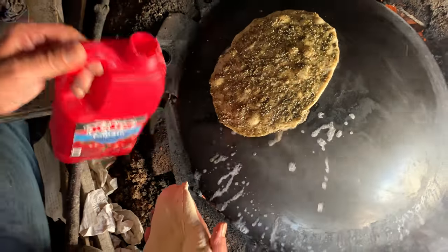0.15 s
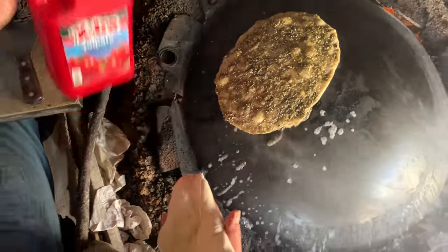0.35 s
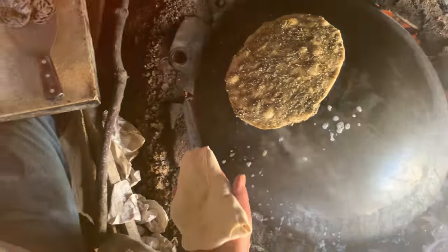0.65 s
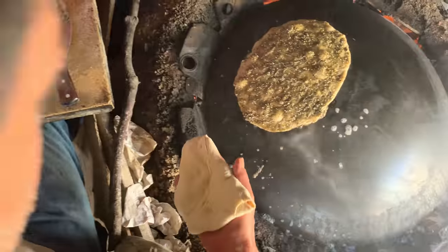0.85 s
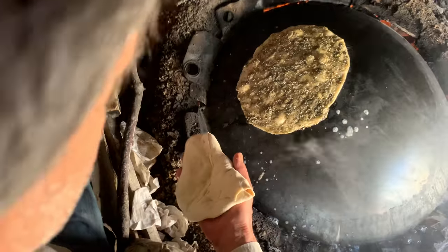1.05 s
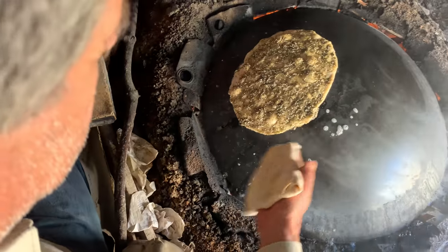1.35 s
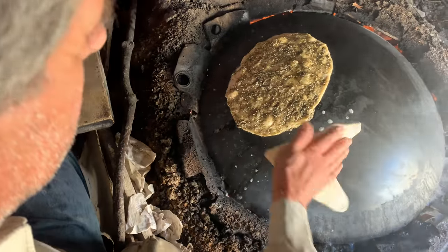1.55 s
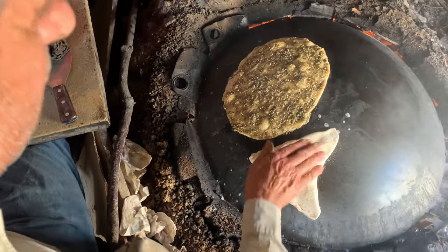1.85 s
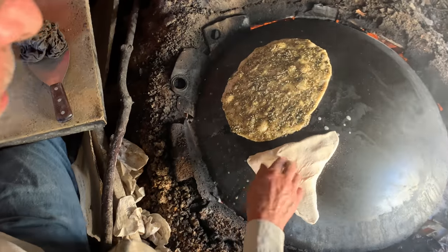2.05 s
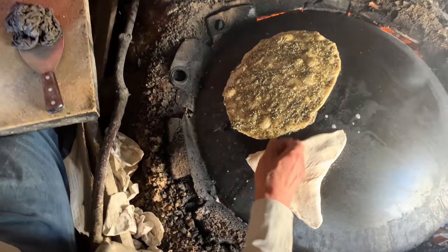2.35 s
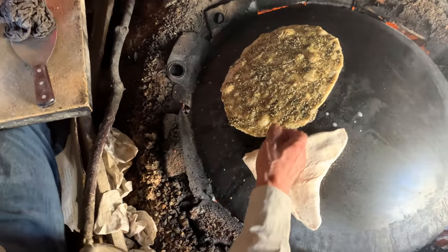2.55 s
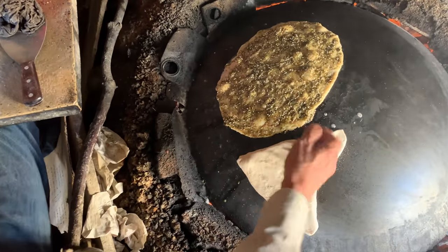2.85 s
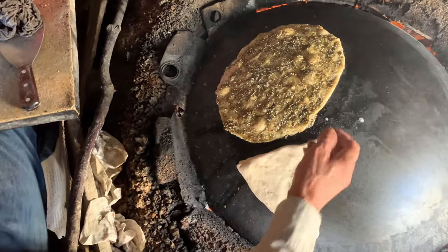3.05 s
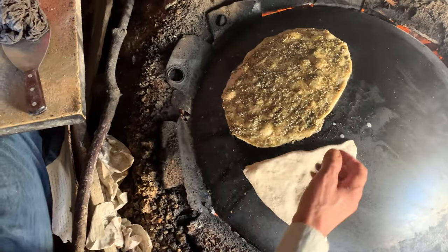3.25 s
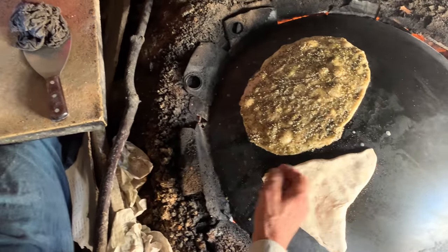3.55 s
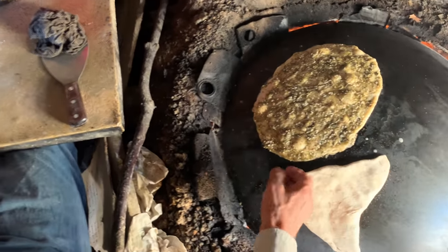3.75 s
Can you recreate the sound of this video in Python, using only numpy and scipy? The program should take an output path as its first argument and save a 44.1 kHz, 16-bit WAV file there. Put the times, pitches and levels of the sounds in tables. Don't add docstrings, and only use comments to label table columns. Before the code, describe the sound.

Water sizzles on a very hot iron griddle, bright, dense and close, fluttering strongly until about 0.9 s, with faint microphone nudges near 0.15 and 0.2 s. It then thins steadily. A jug lands and rocks dully at 1.05 s; dough slaps the damped iron at 1.68 s amid sharp pops. Soft fingertip taps follow from 2 s, with a hard low microphone knock at 3.75 s. Flames rumble quietly beneath.

```python
import sys
import numpy as np
from scipy import signal
from scipy.fft import rfft, irfft, next_fast_len
from scipy.io import wavfile
from scipy.ndimage import uniform_filter1d, map_coordinates

SR = 44100
rng = np.random.default_rng(int(sys.argv[2]) if len(sys.argv) > 2 else 0)


def to_wav(s):
    ch = np.atleast_2d(s).T
    pcm = np.round(np.clip(ch, -1, 1) * 32767)
    wavfile.write(sys.argv[1], SR, pcm.astype(np.int16))


def ratio(d):
    e = np.asarray(d, float) / 20
    return 10 ** e


N = 171990


def unit(x):
    return x / np.sqrt(np.mean(x ** 2) + 1e-20)


def along(points, hz):
    f, db = np.transpose(points)
    return np.interp(np.log(hz + 1), np.log(f + 1), db)


def curve(points):
    s, db = np.transpose(points)
    return np.interp(np.arange(N) / SR, s, db)


def wobble(rate_hz):
    knots = rng.standard_normal(int(N * rate_hz / SR) + 4)
    return map_coordinates(knots, [np.arange(N) * rate_hz / SR])


def coloured(x, points):
    m = 2 * next_fast_len(N // 2 + SR // 4)
    gain = ratio(along(points, np.fft.rfftfreq(m, 1 / SR)))
    cepstrum = irfft(np.log(gain + 1e-6), m)
    cepstrum[1:m // 2] *= 2
    cepstrum[m // 2 + 1:] = 0
    return irfft(rfft(x, m) * np.exp(rfft(cepstrum)), m)[..., :N]


def patchy(x, depth_db):
    z = signal.stft(x, nperseg=256)[2]
    across_hz = uniform_filter1d(rng.standard_normal(z.shape), 8, 0)
    field = unit(uniform_filter1d(across_hz, 20, 1))
    return signal.istft(z * ratio(depth_db * field), nperseg=256)[1][:N]


def struck(hits, modes, spread_db, rise_s):
    out, t = np.zeros(N + SR), np.arange(SR // 4) / SR
    for s, db in hits:
        ring = np.zeros(len(t))
        for hz, gain_db, t60_s in modes:
            fall_db = gain_db + spread_db * rng.standard_normal() - 60 * t / t60_s
            ring += ratio(fall_db) * np.sin(2 * np.pi * hz * t)
        start = round(s * SR)
        out[start:start + len(t)] += ratio(db) * ring * (1 - np.exp(-t / rise_s))
    return out[:N]


def bubbles(spectrum, patch_db):
    bursts_per_s, hiss_share = 8000, 0.49
    size_spread_db, largest_db = 3.5, 16
    chance, sign, size = rng.random((3, N))
    size_db = np.minimum(-size_spread_db * np.log(1 - size), largest_db)
    bursts = (chance < bursts_per_s / SR) * np.sign(sign - 0.5) * ratio(size_db)
    hail = np.sqrt(1 - hiss_share) * unit(bursts)
    hiss = np.sqrt(hiss_share) * rng.standard_normal(N)
    return unit(coloured(patchy(hail + hiss, patch_db), spectrum))


# (time [s], level [dB])
SMALL_LEVEL = [(0.0, -40), (0.03, -41), (0.25, -37.5), (0.38, -40.5), (0.42, -35.5), (0.53, -45),
               (0.69, -46), (0.82, -40.5), (0.9, -40), (0.92, -46.5), (1.43, -47), (1.47, -50), (2.48, -55),
               (2.53, -58.5), (2.79, -58), (2.82, -60), (3.23, -59.5), (3.9, -65)]
# (frequency [Hz], density [dB per Hz])
SMALL_SPECTRUM = [(300, -21.5), (1050, -18.5), (3000, -12), (6500, 0), (16000, -2.25)]
# (time [s], level [dB])
LARGER_LEVEL = [(0, -46.5), (.15, -46.5), (.32, -46.5), (.5, -47), (.68, -49), (.86, -49), (.95, -52),
                (1.4, -55), (1.55, -56.5), (2.3, -59.5), (2.9, -65), (3.9, -67)]
# (frequency [Hz], density [dB per Hz])
LARGER_SPECTRUM = [(300, -15.5), (660, -14), (1100, -7), (3000, -2), (5000, -2.27), (8000, -6),
                   (16000, -28.5)]


def sizzle():
    flurry_db = 0.38 * wobble(14) + 0.5 * wobble(60)
    small_db = curve(SMALL_LEVEL) - 1.4 + 0.29 * wobble(25.18)
    small = ratio(small_db) * bubbles(SMALL_SPECTRUM, patch_db=0.98)
    larger = ratio(curve(LARGER_LEVEL)) * bubbles(LARGER_SPECTRUM, patch_db=1.13)
    return ratio(flurry_db) * (small + larger)


# (time [s], peak level [dB])
POPS = [(0.3253, -27), (0.5528, -26), (0.5573, -23.6), (1.6455, -29), (1.71, -29), (1.7585, -26.5),
        (1.8755, -39), (1.889, -32.6), (1.9526, -31), (2.0123, -36), (2.0777, -32), (2.132, -37),
        (2.2351, -35.4), (2.5832, -46), (2.8001, -38), (3.2102, -34), (3.3259, -34.5), (3.3296, -38.0),
        (3.3407, -47), (3.6444, -38), (3.7048, -37)]
# (frequency [Hz], level [dB])
POP_SPECTRUM = [(500, -34), (3500, -15), (6500, 3), (16000, -3)]


def pops():
    steps = np.zeros(N)
    for s, db in POPS:
        steps[round(s * SR)] = -ratio(db + 3.5)
    return coloured(steps, POP_SPECTRUM)


# (frequency [Hz], level [dB])
PORT = [(6700, 0.5), (7600, 3.5), (9200, 7), (9900, 3), (10700, -1.5), (13700, 4.5), (15600, -2.5),
        (17000, -12)]


def through_port(x):
    return coloured(x, PORT)


# (time [s], low edge [Hz], high edge [Hz], level re sizzle [dB])
SLIPS = [(0.024, 5600, 7000, 0), (.025, 13600, 15700, 2), (.535, 10200, 11800, -1), (1.371, 4300, 9000, 0),
         (2.625, 12400, 15200, 2), (2.88, 13000, 14500, -3), (2.927, 11700, 13200, -3)]


def slips(water):
    slip_s = 0.024
    t, hz = np.arange(N) / SR, np.fft.rfftfreq(N, 1 / SR)
    other = np.fft.rfft(np.roll(water, -SR // 40))
    side = np.zeros(N)
    for s, low_hz, high_hz, db in SLIPS:
        window = np.cos(np.pi * np.clip((t - s) / slip_s, -0.5, 0.5))
        band = np.fft.irfft(other * (hz > low_hz) * (hz < high_hz), N)
        side += ratio(db) * window * band
    return side


# (time [s], peak level [dB])
SLAPS = [
    (1.667, -46),
    (1.6727, -45),
    (1.6757, -31.5),
    (1.6805, -47),
    (1.6828, -43),
    (1.6845, -46),
]
# (frequency [Hz], level [dB], decay T60 [s])
IRON = [(130, -16, .07), (450, -15, .02), (727, -17, .035), (1050, 0, .017), (1350, -9, .012),
        (1900, -7, .014), (3500, -14, .012)]


def slaps():
    return struck(SLAPS, IRON, spread_db=3, rise_s=0.00026)


# (time [s], peak level [dB], pitch [Hz], thump weight [1])
PATS = [(2.009, -60.5, 956, 0.6), (2.098, -60, 1050, 0.6), (2.359, -68, 1130, 0.7),
        (2.502, -55.5, 463, 0.71), (2.569, -61.5, 468, 0.6), (2.657, -62, 339, 0.96),
        (2.768, -61, 990, 0.63), (2.906, -62, 1060, 0.81), (2.986, -59.5, 490, 0.6), (3.01, -66, 463, 0.75),
        (3.146, -58.5, 546, 0.6), (3.178, -60, 458, 0.49), (3.227, -55, 526, 0.37), (3.411, -58, 328, 0.6),
        (3.485, -57, 1050, 0.42), (3.651, -57, 482, 0.8), (3.776, -61.5, 1200, 0.6), (3.838, -61, 650, 0.6),
        (3.871, -52, 363, 0.4)]


def pats():
    out, t = np.zeros(N + SR), np.arange(SR // 8) / SR
    soft = signal.butter(2, [300, 1200], "band", fs=SR, output="sos")
    tap_shape = ratio(-60 * t / 0.01) * (1 - np.exp(-t / 0.00055))
    puff_shape = 0.23 * ratio(-60 * t / 0.086) * (1 - np.exp(-t / 0.0013))
    iron_thump = 0.55 * ratio(-60 * t / 0.064) * np.sin(2 * np.pi * 170 * t)
    for s, db, hz, weight in PATS:
        tap = tap_shape * np.sin(2 * np.pi * hz * t)
        puff = puff_shape * unit(signal.sosfilt(soft, rng.standard_normal(len(t))))
        start = round((s + 0.001) * SR)
        out[start:start + len(t)] += ratio(db + 8.5) * (tap + puff + weight * iron_thump)
    return out[:N]


# (time [s], peak level [dB])
JUG_TAPS = [
    (1.0445, -46),
    (1.063, -50),
    (1.076, -56),
    (1.107, -55),
    (1.131, -58),
    (1.256, -60),
]
# (frequency [Hz], level [dB], decay T60 [s])
JUG = [(260, 0, 0.095), (308, -2, 0.034), (433, -5, 0.047), (570, -10, .03)]


def jug():
    return struck(JUG_TAPS, JUG, spread_db=1.9, rise_s=0.00064)


# (time [s], push level [dB], swing level [dB], swing rise [s])
BUMPS = [
    (.144, -46, -51, .002),
    (.221, -52, -56, .002),
    (3.7494, -32, -38.5, .0008),
    (3.7605, -62, -39, .006),
    (3.7785, -62, -46, .004),
]
# (frequency [Hz], level [dB], decay T60 [s])
MOUNT = [(85, 1.5, 0.056), (55, -7, 0.046), (150, -10, .02)]


def bumps():
    push_s = 0.0008
    out, t = np.zeros(N), np.arange(N) / SR
    for s, push_db, swing_db, rise_s in BUMPS:
        out -= ratio(push_db) / np.cosh(np.clip((t - s) / push_s, -30, 30))
        out += struck([(s + push_s, swing_db)], MOUNT, spread_db=4.3, rise_s=rise_s)
    return out


# (frequency [Hz], density [dB per Hz])
FIRE_SPECTRUM = [(4.7, -33), (8.0, 9), (25, 2), (34, -20), (38, -15), (102, -10.5), (134, -10.5),
                 (300, -32), (390, -50.5), (660, -120)]
# (time [s], level [dB])
FIRE_LEVEL = [(0.0, -56.5), (0.41, -52), (0.61, -56), (1.15, -57.5), (1.36, -59.5), (3.2, -62),
              (3.9, -53.5)]


def fire():
    rumble = coloured(rng.standard_normal(N), FIRE_SPECTRUM)
    return ratio(curve(FIRE_LEVEL)) * unit(ratio(0.5 * wobble(7.45)) * rumble)


# (frequency [Hz], density [dB per Hz])
AIR_SPECTRUM = [(120, -27), (200, -6.5), (390, -13), (504, -9.5), (784, -9), (6000, -21.5), (7800, -51.5),
                (13200, -120)]


def air():
    return ratio(-72) * unit(coloured(patchy(rng.standard_normal(N), depth_db=1.0), AIR_SPECTRUM))


def scene():
    water = through_port(sizzle() + pops())
    mid = water + slaps() + pats() + jug() + bumps() + fire() + air()
    side = slips(water)
    return np.array([mid + side, mid - side])


def band_limit(x):
    return signal.sosfilt(signal.butter(12, 16050, fs=SR, output="sos"), x)


def record(dry):
    return band_limit(dry)


dry = scene()
out = record(dry)
to_wav(out)
```